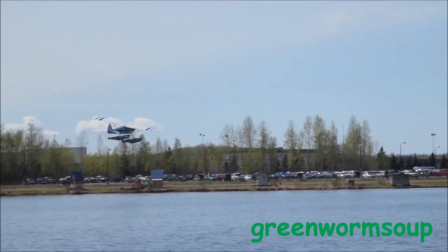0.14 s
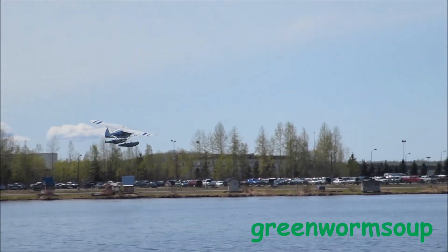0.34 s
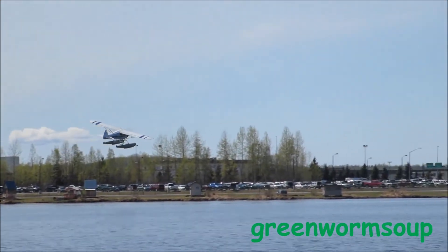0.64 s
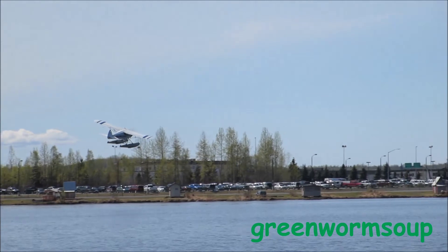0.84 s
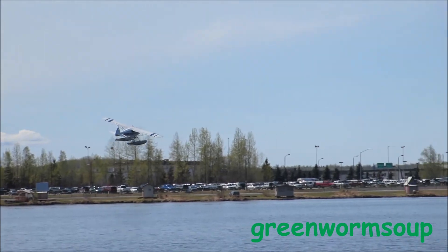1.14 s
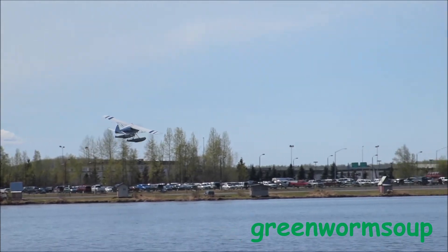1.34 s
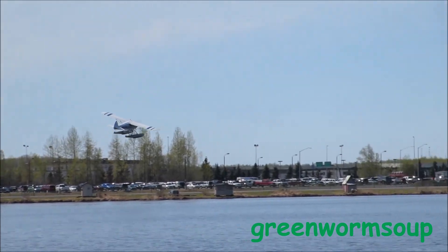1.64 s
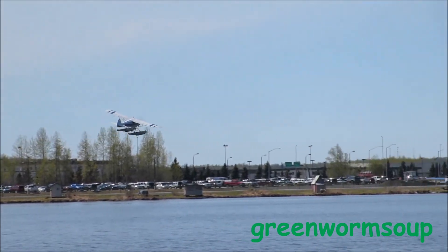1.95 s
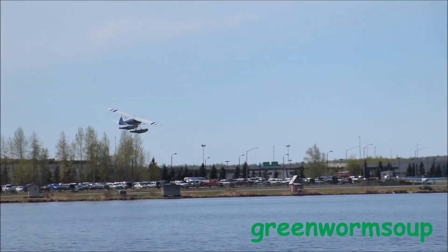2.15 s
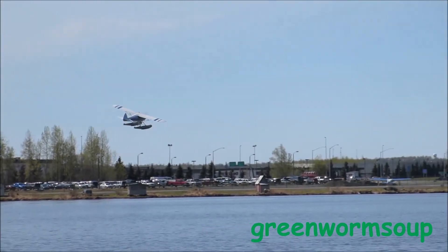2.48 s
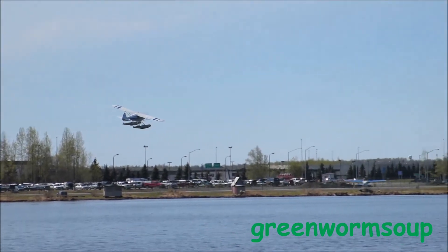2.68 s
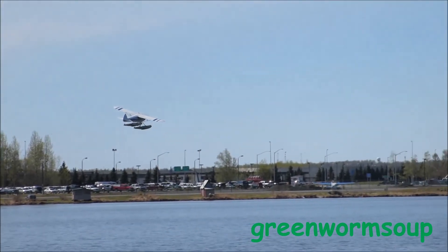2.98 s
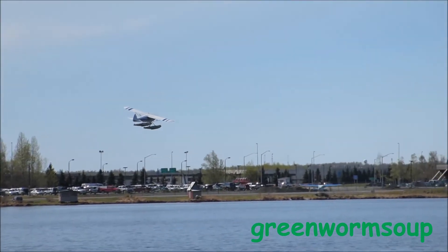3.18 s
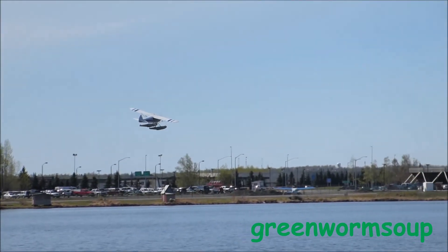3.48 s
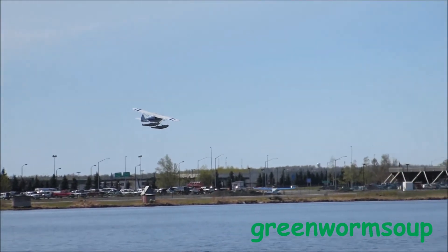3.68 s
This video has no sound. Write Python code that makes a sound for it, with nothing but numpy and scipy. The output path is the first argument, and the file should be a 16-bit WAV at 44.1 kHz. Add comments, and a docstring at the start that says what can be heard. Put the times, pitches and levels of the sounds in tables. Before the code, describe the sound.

A small propeller plane drones throughout as it climbs away over open water. Its low, buzzing hum holds one pitch, with rapid engine pulses and a coarse exhaust rasp over a low roar. It is fullest in the first second, wavers in moving air, and softens gradually after about 2 seconds, still audible at nearly 4 seconds. Faint wind rumble and very slight hiss lie beneath, heard from the shore.

```python
"""Propeller plane climbing away

A small four-cylinder propeller plane climbs away over a lake, heard from the shore.
Propeller and exhaust hum on multiples of the engine cycle, summed as wavering cosines.
Each firing rings the pipe and spits a puff of rasp: coloured noise gated by the firings, over a low roar.
Moving air makes the tones swell and the treble come and go; a light rumble of wind and faint hiss lie below.
"""
import sys
import numpy as np
from scipy import signal
from scipy.io import wavfile
from scipy.ndimage import uniform_filter1d

SR = 44100
rng = np.random.default_rng(int(sys.argv[2]) if len(sys.argv) > 2 else 0)


def materialize(psi):
    """Save the field psi as 16-bit PCM at rate SR to the path in sys.argv[1].

    A 1-D psi becomes a single channel; in a 2-D psi each row is a channel.
    """
    bounded = np.clip(np.atleast_2d(psi).T, -1, 1)
    quanta = np.round(bounded * 32767).astype(np.int16)
    wavfile.write(sys.argv[1], SR, quanta)


N = 168462

# Engine speed. Each row: time in seconds, engine cycles per second in Hz.
ENGINE_SPEED = [(0, 19.97), (1.9, 19.955), (3.82, 19.975)]
# Harmonics of the engine cycle. Each row: multiple, relative level in dB (unused for multiples 4 and 8).
HARMONICS = [(1, -45), (2, -25.5), (3, -36.5), (4, 0), (5, -14.5), (6, -15), (7, -48), (8, -3), (9, -14.5),
             (10, -21.5), (11, -21.5), (12, -5.5), (13, -21), (14, -16.5), (15, -18), (16, -10), (17, -23),
             (18, -27), (19, -32.5), (20, -17), (21, -30.5), (22, -50), (23, -12), (24, -6), (25, -49),
             (26, -12.5), (27, -17.5), (28, -24.5), (29, -15), (30, -39), (31, -35.5), (32, -18), (33, -30),
             (34, -15.5), (35, -27.5), (36, -18.5), (37, -25), (38, -21.5), (39, -37), (40, -25)]
# Swell of the firing tone, multiple 4. Each row: time in seconds, level in dB.
FIRING_SWELL = [(0.08, -24.5), (0.11, -31), (0.2, -17.5), (0.37, -16), (0.52, -19), (0.59, -27),
                (0.86, -18.5), (1.05, -18.5), (1.16, -25), (1.44, -18.5), (1.58, -25), (1.63, -26),
                (1.69, -28.5), (1.79, -32.5), (1.87, -20.5), (1.99, -19), (2.17, -18.5), (2.34, -35),
                (2.6, -19), (2.92, -26), (3.05, -20.5), (3.5, -22), (3.64, -29.5), (3.75, -22)]
# Swell of its octave, multiple 8. Each row: time in seconds, level in dB.
OCTAVE_SWELL = [(0.08, -18.5), (0.31, -18), (0.4, -21.5), (1.16, -22.5), (1.34, -30.5), (1.43, -23),
                (2.42, -32.5), (2.47, -38.5), (2.49, -31), (2.7, -24), (2.73, -29.5), (3.75, -26.5)]
# Common level of the other harmonics, followed by the roar too. Each row: time in seconds, level in dB.
DRONE_LEVEL = [(0.05, -20), (0.76, -21.5), (0.79, -23.5), (0.95, -20.5), (0.97, -22.5), (1.91, -22.5),
               (3.19, -26), (3.43, -25), (3.76, -26)]
# Rasp over time. Each row: time in seconds, level in dB, then low, middle and top treble in dB.
# Only the departure of each treble column from its own mean is heard.
RASP_LEVELS = [(0.05, -25.5, -18, -27, -38), (0.18, -26.5, -13.5, -27.5, -44), (0.79, -28, -18, -31.5, -48),
               (1.21, -32, -15, -35, -43), (1.34, -32, -21, -33.5, -44), (1.7, -30.5, -17, -29.5, -46.5),
               (1.81, -29.5, -21, -35.5, -43.5), (2.0, -31.5, -22.5, -31, -43.5),
               (2.13, -28, -21.5, -39.5, -46), (2.31, -29, -21, -34, -45.5), (2.65, -31, -23.5, -38, -44.5),
               (2.95, -36.5, -19, -36.5, -36.5), (2.98, -33.5, -21.5, -39, -43),
               (3.52, -30.5, -22, -38, -44), (3.69, -27.5, -22, -34, -45), (3.75, -28.5, -19, -38, -44.5),
               (3.76, -28, -25, -39, -49.5)]
# Firings of one cycle. Each row: place in the cycle from 0 to 1, relative puff strength in dB.
FIRINGS = [(0.071, -9), (.33, -17.5), (0.568, -14), (0.828, -17)]
# Spectrum of the rasp. Each row: frequency in Hz, relative level in dB per Hz.
RASP_SPECTRUM = [(300, -60.5), (600, -18.5), (800, -4.5), (910, -14.5), (994, 1.5), (1150, -10),
                 (1250, -0.5), (1360, -4), (1480, 2), (1660, -7), (1920, -1), (2110, -13.5), (2420, -15),
                 (2800, -25), (3260, -19.5), (3600, -23), (4240, -33.5), (4700, -38), (5300, -36.5),
                 (6100, -39), (6800, -47.5), (8000, -56), (11000, -62), (15700, -67.5)]
# Spectrum of the roar. Each row: frequency in Hz, relative level in dB per Hz.
ROAR_SPECTRUM = [(40, -25), (100, -13), (200, 4.5), (400, 6), (550, 14), (750, -0.5), (900, -2),
                 (1200, -56)]
# Spectrum of the wind. Each row: frequency in Hz, relative level in dB per Hz.
WIND_SPECTRUM = [(20, -35), (30, -38), (45, -8), (65, -5.5), (110, -10.5), (200, -5)]
# Spectrum of the microphone hiss. Each row: frequency in Hz, relative level in dB per Hz.
HISS_SPECTRUM = [(2000, -3), (6000, -1), (10000, -4), (15700, -12)]
# Stereo coherence of noise. Each row: frequency in Hz, left-right likeness from 0 to 1.
COHERENCE = [(60, .999), (130, .994), (280, .98), (600, .96), (1300, .94), (2500, .88), (5000, .82),
             (9000, .88), (13000, .96)]
# Stereo phase. Each row: frequency in Hz, lead of the left channel in radians.
LEFT_LEAD = [(60, 0.01), (150, 0.08), (520, 0.26), (860, -0.5), (1890, 0.33), (2580, .2), (3500, 0.5),
             (6000, .7), (12000, .2)]
# Stereo balance. Each row: frequency in Hz, left minus right in dB.
LEFT_LEAN = [(60, -.05), (150, -.3), (300, .4), (550, 1.1), (1000, -.2), (4000, -.05)]
# Anchors of the treble movement, in Hz: a still point, then the low, middle and top treble.
TREBLE_ANCHORS = [2000, 3570, 5750, 9500]

PUFF_RISE_S, PUFF_FALL_S, PUFF_SPREAD_DB = .0025, .004, 1.0
STEADY_SHARE, ROAR_STEADY = 1.2, 2.5  # constants added to the puff train of rms 1; the roar adds both
WAVER_DB, WAVER_RAD, WAVER_HZ = 2.0, .45, 4.0  # rms swell, rms phase at PIPE_FROM_HZ, fastest waver
FIRST_FIRING, SKEW_RAD = .879, 2.94  # place of the thump in the cycle, its lean
# The pipe's ring runs ahead of the thump.
THUMP_TOP_HZ, PIPE_LEAD_S, PIPE_FROM_HZ, PIPE_TURN_RAD = 240, .0045, 380, .9
UNEVEN_RAD = 1.3  # random phase of the odd multiples, which tell the cylinders apart
LIKENESS = .35  # how far one cycle's noise repeats the last
ROAR_DB, WIND_DB, HISS_DB = -4, -28.5, -89  # the roar is relative to the drone
EDGE_HZ = 15780  # band limit


def tones(cycle):
    """Harmonic synthesis: phase-aligned multiples of the cycle form thumps, and moving air modulates each."""
    count = len(HARMONICS)
    swells, slips = drift(WAVER_HZ, count), drift(WAVER_HZ, count)
    strongest, rest = np.zeros((2, N)), np.zeros((2, N))
    for (k, db), swell, slip in zip(HARMONICS, swells, slips):
        hz = k * ENGINE_SPEED[0][1]
        # A phase lead rising with frequency is an advance in time: the ring of the pipe.
        lead = SKEW_RAD + 2 * np.pi * max(hz - THUMP_TOP_HZ, 0) * PIPE_LEAD_S
        lead += PIPE_TURN_RAD * (hz > PIPE_FROM_HZ)
        lead += UNEVEN_RAD * rng.standard_normal() * (k % 2)
        waver = WAVER_RAD * np.sqrt(hz / PIPE_FROM_HZ) * slip
        angle = 2 * np.pi * k * (cycle - FIRST_FIRING) + lead + waver
        left = np.cos(angle)
        right = np.cos(angle - read(LEFT_LEAD, hz)) / gain_of(read(LEFT_LEAN, hz))
        pair = np.array([left, right])
        if k in (4, 8):
            level = curve(FIRING_SWELL if k == 4 else OCTAVE_SWELL)
            strongest += np.sqrt(2) * gain_of(level + 0.48 * swell) * pair
        else:
            rest += gain_of(db + WAVER_DB * swell) * pair
    return strongest + gain_of(curve(DRONE_LEVEL)) * evened(rest)


def puffs(cycle):
    """Impulse-train excitation: each firing releases one pressure puff, with a strength set by its cylinder."""
    train = np.zeros(N)
    for place, db in FIRINGS:
        at = np.flatnonzero(np.diff(np.floor(cycle - place)))
        spread = PUFF_SPREAD_DB * rng.standard_normal(200)[:len(at)]
        train[at] = gain_of(db + spread)
    t = np.arange(1500) / SR
    shape = (1 - np.exp(-t / PUFF_RISE_S)) ** 2 * np.exp(-t / PUFF_FALL_S)
    return STEADY_SHARE + evened(signal.oaconvolve(train, shape)[:N])


def rasp(beat):
    """Amplitude modulation: firings gate the exhaust hiss; distance and drifting air alter its treble."""
    exhaust = noise(RASP_SPECTRUM, patchy_db=0.5, spots_db=3.0, treble=RASP_LEVELS)
    return gain_of(curve(RASP_LEVELS)) * evened(beat) * repeating(exhaust)


def roar(beat):
    """Turbulence: low broadband noise of exhaust and propeller fills the gaps between the tones."""
    turbulence = noise(ROAR_SPECTRUM, size=1024, patchy_db=0.5)
    level = gain_of(curve(DRONE_LEVEL) + ROAR_DB)
    return level * evened(ROAR_STEADY + beat) * repeating(turbulence)


def repeating(x):
    """Recursive comb filtering: feedback delayed by one engine cycle makes noise partly periodic."""
    step = round(SR / ENGINE_SPEED[0][1])
    rows = np.pad(x, [(0, 0), (0, -N % step)]).reshape(2, -1, step)
    combed = signal.lfilter([1], [1, -LIKENESS], rows, axis=1)
    return evened(combed.reshape(2, -1)[:, :N])


def wind():
    """Low-frequency noise with slow random modulation of level: a lumpy rumble."""
    lumps = 0.89 * drift(6.0, count=1)[0]
    return gain_of(WIND_DB + lumps) * noise(WIND_SPECTRUM + [(400, -70)], size=4096)


def microphone_hiss():
    """Stationary self-noise: a faint coloured hiss of constant level."""
    return gain_of(HISS_DB) * noise(HISS_SPECTRUM)


def noise(colour, size=512, patchy_db=0., spots_db=0., treble=None):
    """Short-time spectral synthesis: random stereo spectra with drifting patches and short treble spots."""
    hop = size // 4
    frames, hz = N // hop + 5, np.fft.rfftfreq(size, 1 / SR)
    a, b, c, d, patches, spots = rng.standard_normal((frames, len(hz), 6)).T
    # Axis 0 is frequency, axis 1 is time.
    patches = evened(uniform_filter1d(uniform_filter1d(patches, size=5, axis=0), size=40, axis=1))
    spots = evened(uniform_filter1d(uniform_filter1d(spots, size=4, axis=0), size=5, axis=1))
    same = np.clip(read(COHERENCE, hz), 0, 1)[:, None]
    left, other = a + 1j * b, c + 1j * d
    turn = (np.exp(-1j * read(LEFT_LEAD, hz)) / gain_of(read(LEFT_LEAN, hz)))[:, None]
    right = turn * (same * left + np.sqrt(1 - same ** 2) * other)
    spot_weight = np.minimum(hz / 3000, 1)[:, None]
    field_db = read(colour, hz)[:, None] + patchy_db * patches + spots_db * spots * spot_weight
    if treble is not None:
        t = np.arange(frames) * hop / SR
        for k in range(1, 4):
            level = curve(treble, axis=k + 1, t=t)
            band = read(list(zip(TREBLE_ANCHORS, np.eye(4)[k])), hz)[:, None]
            field_db = field_db + band * (level - level.mean())
    spectra = np.array([left, right]) * gain_of(field_db)
    return evened(signal.istft(spectra, nperseg=size, noverlap=size - hop)[1][:, :N])


def drift(top_hz, count):
    """Superposition: 24 slow sines of random phase add up to each wandering of rms 1."""
    t = np.arange(0, N + 256, 256) / SR
    f = np.geomspace(.2, top_hz, num=24)
    phase = f[:, None] * t + rng.random((count, 24, 1))
    waves = np.sin(2 * np.pi * phase) / f[:, None] ** .3
    return [np.interp(np.arange(N) / SR, t, evened(w)) for w in waves.sum(axis=1)]


def curve(rows, axis=1, t=None):
    """Linear interpolation in time of one table column."""
    rows = np.array(rows)
    return np.interp(np.arange(N) / SR if t is None else t, rows[:, 0], rows[:, axis])


def read(points, hz):
    """Interpolation of a spectrum on a logarithmic frequency axis."""
    f, value = np.transpose(points)
    return np.interp(np.log(hz + 1), np.log(f + 1), value)


def evened(x):
    """Power normalisation: scales to rms 1."""
    return x / np.sqrt(np.mean(x ** 2) + 1e-20)


def gain_of(db):
    """Logarithmic level: decibels to amplitude gain."""
    return 10 ** (np.asarray(db) / 20)


def scene():
    """Superposition of engine and wind; integrated speed gives the position in the engine cycle."""
    cycle = np.cumsum(curve(ENGINE_SPEED)) / SR
    beat = puffs(cycle)
    return tones(cycle) + rasp(beat) + roar(beat) + wind()


def record(dry):
    """Additive microphone noise, then band limitation by a linear-phase low-pass."""
    wet = dry + microphone_hiss()
    low_pass = signal.firwin(511, EDGE_HZ, window=("kaiser", 9), fs=SR)
    return signal.oaconvolve(wet, low_pass[None], "same")


dry = scene()
out = record(dry)
materialize(out)
```